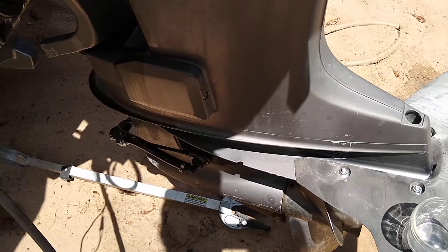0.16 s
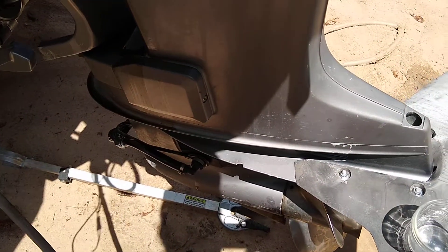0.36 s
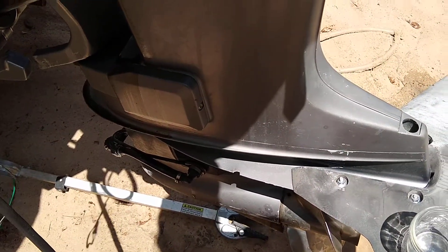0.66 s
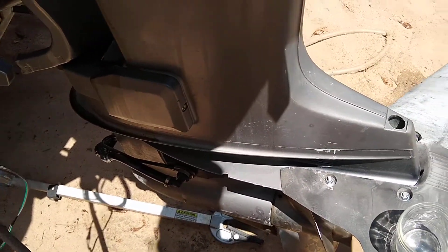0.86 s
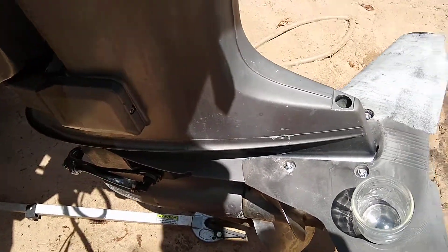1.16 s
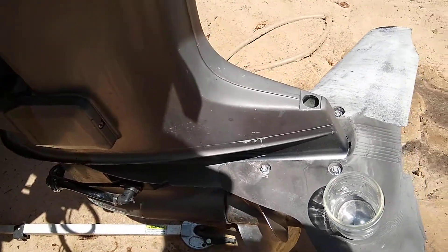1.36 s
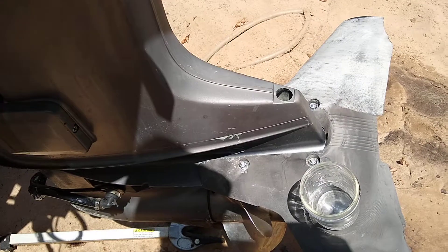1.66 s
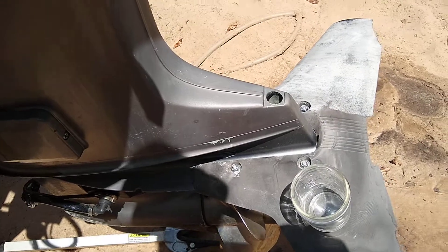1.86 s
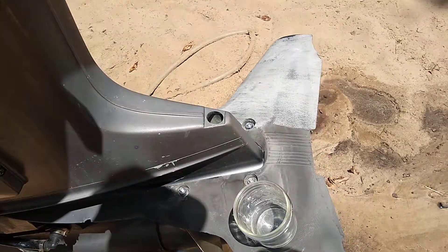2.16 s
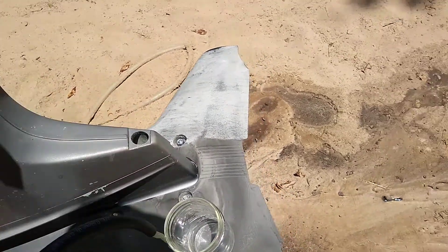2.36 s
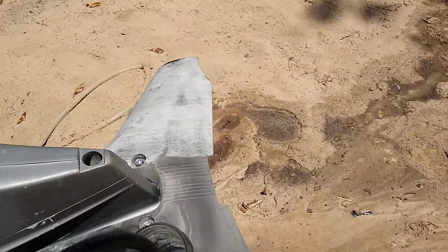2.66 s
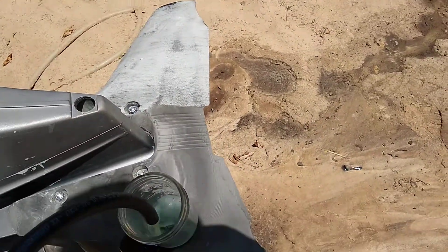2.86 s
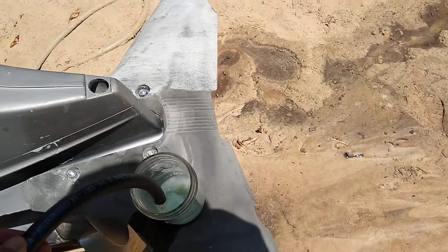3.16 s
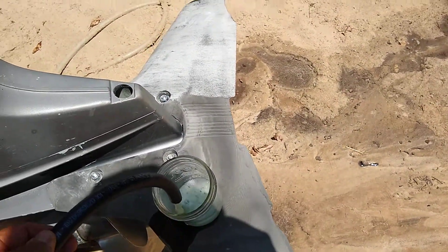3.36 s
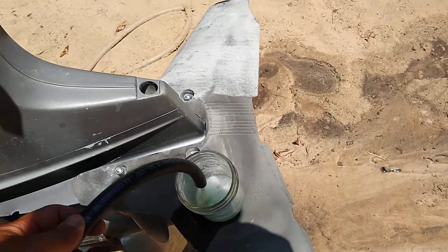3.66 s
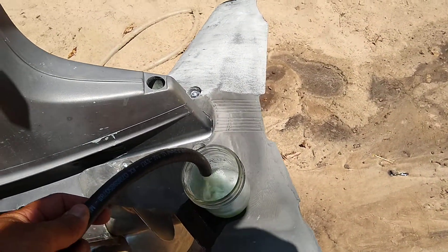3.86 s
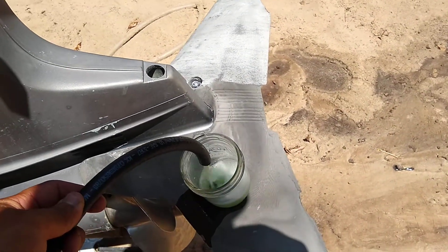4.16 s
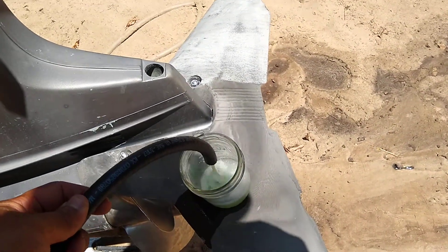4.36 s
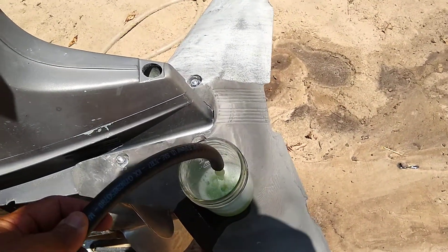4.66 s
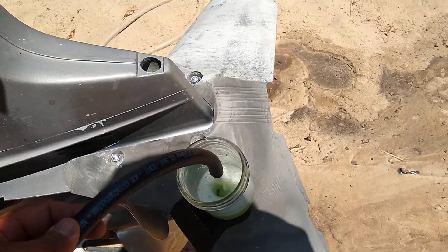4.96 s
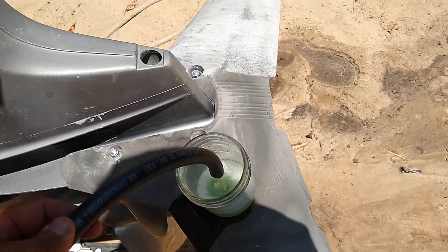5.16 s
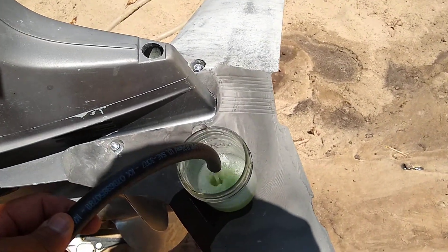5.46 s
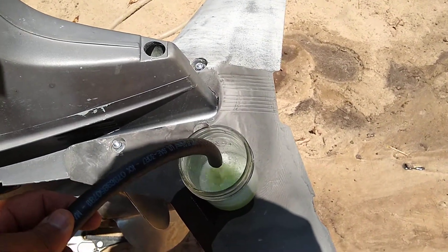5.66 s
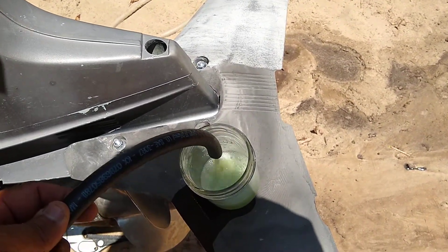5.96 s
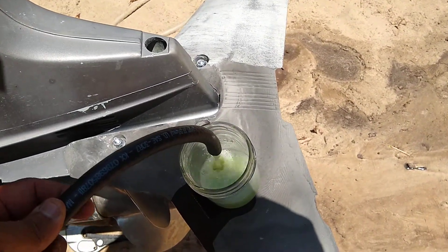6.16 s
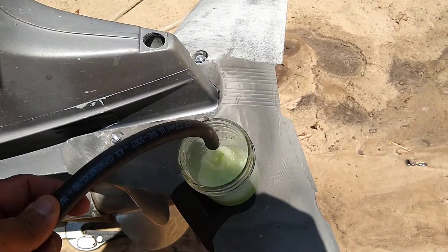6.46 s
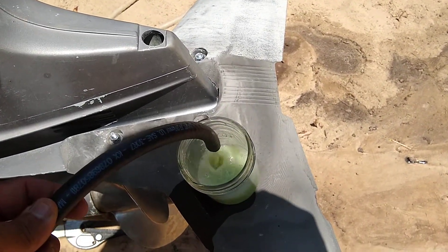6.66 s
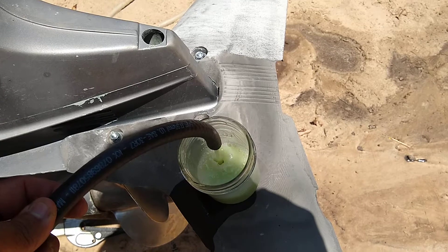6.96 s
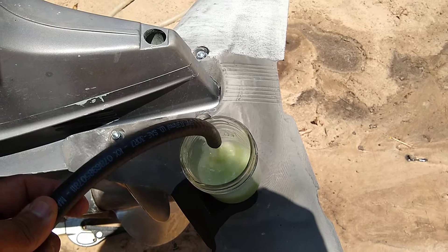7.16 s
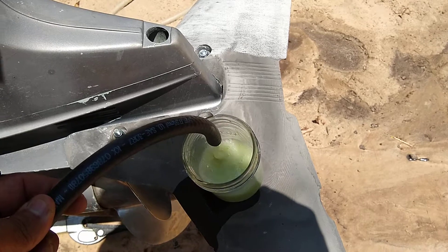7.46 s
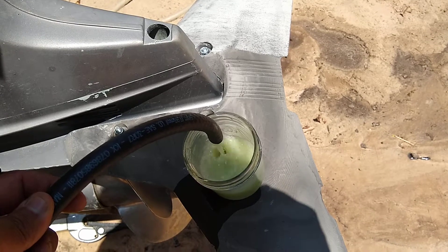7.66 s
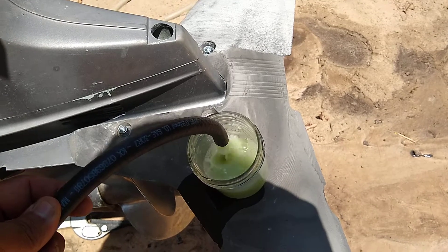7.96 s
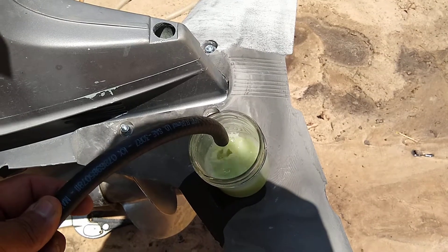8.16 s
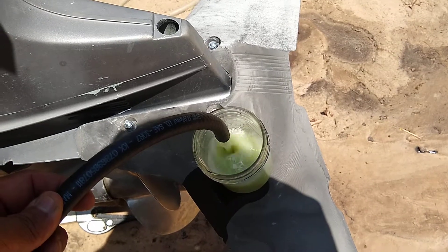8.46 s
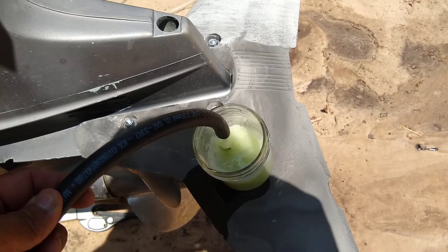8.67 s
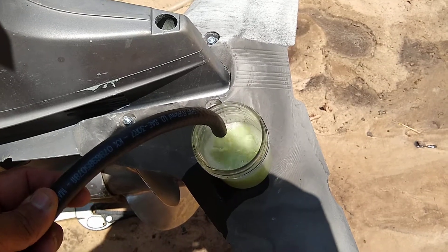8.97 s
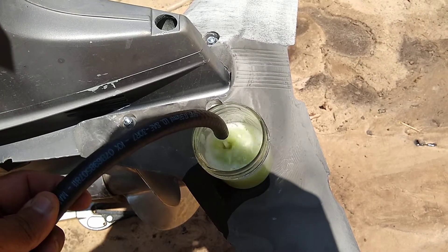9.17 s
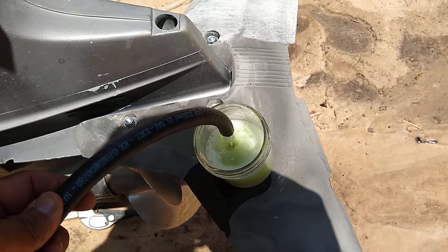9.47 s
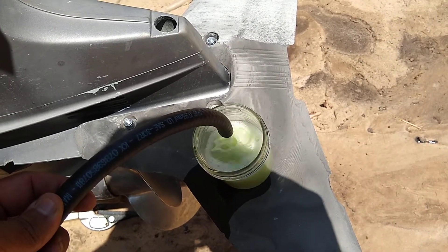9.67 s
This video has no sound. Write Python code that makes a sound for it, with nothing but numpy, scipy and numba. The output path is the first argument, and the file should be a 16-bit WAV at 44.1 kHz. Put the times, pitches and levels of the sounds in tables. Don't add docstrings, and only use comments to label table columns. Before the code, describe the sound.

Close, dry phone pickup: a rapid, raspy pump runs throughout, sizzling at first and duller as the phone turns away. Early ticks, drags and dull bumps come from a hose on a vehicle's plastic panel. After about four seconds, pulsed liquid bubbles and splashes inside a glass jar, with wet slaps and bright drips, rising in pitch. Low open-air rumble, small wind puffs and a very faint distant machine hum come late.

```python
import sys
import numpy as np
from scipy import signal
from scipy.fft import rfft, irfft, next_fast_len
from scipy.io import wavfile
from scipy.ndimage import uniform_filter1d
from numba import njit

SR = 44100
rng = np.random.default_rng(int(sys.argv[2]) if len(sys.argv) > 2 else 0)


def voltage_ratio(level):
    return 10 ** (np.asarray(level, float) / 20)


def waveform_to_disk(signal):
    frames = np.transpose(np.atleast_2d(signal))
    scaled = np.clip(frames, -1, 1) * 32767
    samples = np.round(scaled).astype(np.int16)
    wavfile.write(sys.argv[1], SR, samples)


N = 432534
T = np.arange(N) / SR
PATHS = 3
STROKE_HZ = 17.377
TURNED_S, AT_JAR_S = 3, 4.95

# (time [s], lead over an even beat [strokes])
STROKE_SLIP = [(0.3, 0.186), (1.1, 0.168), (1.9, 0.159), (2.7, 0.114), (3.5, 0.147), (4.3, 0.138),
               (5.1, 0.131), (5.9, 0.101), (6.7, 0.138), (7.5, 0.152), (8.3, 0.177), (9.1, 0.155)]


def stroke_count():
    return STROKE_HZ * T + curves(STROKE_SLIP)[0] + .265


# (time [s], rasp [dB], knock [dB], leak between pushes [dB])
PUMP_LEVELS = [(0.0, -49, -70, -72), (0.5, -47.5, -54, -69), (1.2, -49.5, -69, -54), (1.9, -48, -53.5, -37),
               (2.4, -51, -55.5, -54), (3.0, -47, -47.5, -77), (3.6, -46.5, -50, -95),
               (4.3, -50.5, -48, -3.5), (4.9, -46.5, -48, -26), (5.6, -56, -53.5, -3),
               (6.1, -49.5, -51, -22), (6.8, -50.5, -48.5, -10), (7.5, -51, -52, -25), (8.0, -56, -50.5, 1),
               (8.4, -50.5, -49, -10.5), (8.8, -54.5, -54, -28), (9.2, -53, -51.5, -6),
               (9.81, -54, -56, -38)]


def pump(strokes):
    rasp_db, knock_db, leak_db = curves(PUMP_LEVELS)
    beat, phase = np.divmod(strokes, 1)
    chance = rng.standard_normal((200, 3))[beat.astype(int)].T
    end = .45 + .025 * chance[0]
    push = np.minimum(phase / .03, 1) * np.exp(-np.maximum(phase - end, 0) / .1)
    push = push * voltage_ratio(1.5 * chance[1])
    gate = push + voltage_ratio(leak_db) * voltage_ratio(-7 * phase)
    snap = np.exp(-np.abs(phase - end + 0.0408) / STROKE_HZ / 0.00064)
    snap = (phase > end - .06) * snap * voltage_ratio(1.0 + 0.94 * chance[2])
    flow = grit(400, 3.6, 12.6) * (gate + snap)
    spit = grit(200, 7, 0.13) * (push + voltage_ratio(leak_db - 6)) * voltage_ratio(1.8 * chance[0])
    sizzle_db = -6.5 + 0.5367 * T
    hiss = rasp(flow, chance[0]) + voltage_ratio(sizzle_db) * sizzle(voltage_ratio(-8) * flow + spit)
    hiss = colour(hiss, [(12900, 0), (14100, -24)]) + fizz(flow * (push + voltage_ratio(-25)), chance[2])
    return voltage_ratio(rasp_db + 6.5) * hiss + voltage_ratio(knock_db + 2.0) * knock(phase, chance[2])


# (frequency [Hz], gain [dB])
RASP_TONE = [(1200, -43), (2200, 5.5), (4300, 1.5), (6500, 6), (8800, -21), (13000, 2.5), (14500, -45)]


def rasp(flow, chance):
    ring_hz = np.interp(T, [0.4, TURNED_S], [7180, 5940])
    casing = ring(flow, ring_hz * (1 + 0.043 * chance), 1470.0)
    return unit(colour(flow, RASP_TONE) + voltage_ratio(5.5) * casing)


# (frequency [Hz], width [Hz], level [dB])
SIZZLE_MODES = [(9000, 1300, 3.5), (11450, 1300, 11.5), (9200, 4100, -31), (12600, 690, -33)]
# (time [s], frequency [Hz], level [dB])
GLINT = [(0, 12400, 9.5), (.9, 11980, 13.5), (1.5, 12400, 3), (2.1, 10500, -9), (2.6, 11700, 10),
         (3.5, 11860, 12.5), (4.0, 10700, 7), (5.0, 11700, 7), (7.0, 11400, -4), (9.81, 11600, 0)]


def sizzle(spit):
    glint_hz, glint_db = curves(GLINT)
    return unit(modes(spit, SIZZLE_MODES) + voltage_ratio(glint_db) * ring(spit, glint_hz, 980.0))


FIZZ_HZ = 13400, 14200, 15000, 15700


def fizz(flow, chance):
    turns_s = [TURNED_S - .1, TURNED_S + .2, AT_JAR_S - .2, AT_JAR_S + 0.16]
    fizz_db = np.interp(T, turns_s, [-9, -9, -9, -16])
    total = 0
    for hz in FIZZ_HZ:
        patch = colour(flow, [(hz - 700, -40), (hz - 350, 0), (hz + 350, 0), (hz + 700, -40)])
        total = total + voltage_ratio(4 * walk(count=35).clip(-2.5, 1)) * patch
    return voltage_ratio(fizz_db + 2.2 * chance) * unit(total)


# (frequency [Hz], width [Hz], level [dB])
KNOCK_MODES = [(122, 22, -14), (208.7, 4.5, 1), (293, 10.5, -1.5), (334.5, 13.3, 2), (377, 28.6, -1.5),
               (506.3, 22, -0.5), (630, 19, -4), (787.6, 18, 0), (1049, 50, 5)]


def knock(phase, chance):
    since = (phase - .47) % 1 / STROKE_HZ
    blow = np.sin(np.pi * np.minimum(since / .0012, 1)) ** 2
    rattle = noise() * np.minimum(since / 0.021, 1) * np.exp(-since / 0.003)
    strike = (unit(blow) + unit(rattle)) * voltage_ratio(2.2 * chance)
    return unit(modes(strike, KNOCK_MODES, drift=.035 * walk(count=3)))


# (time [s], pitch [Hz])
COLUMN = [(3.5, 885), (4.5, 863), (6.1, 948), (7.0, 1008), (8.5, 1201), (9.81, 1320)]
# (time [s], peak [dB], pitch [Hz])
PLOPS = [(0.146, -39, 1090), (0.883, -41.5, 1010), (3.736, -33, 870), (4.308, -25.5, 1003),
         (4.577, -29.5, 884), (5.042, -31.5, 900), (5.265, -31.5, 1240), (5.294, -29, 950),
         (5.39, -31, 860), (5.553, -23.5, 954), (5.605, -32, 864), (5.711, -28.5, 937), (5.946, -33, 857),
         (6.074, -29, 890), (6.172, -32, 956), (6.312, -33.5, 914), (6.42, -32, 960), (6.5, -28, 920),
         (6.713, -26.5, 1040), (6.816, -22.5, 926), (6.974, -34.5, 850), (7.573, -30, 1040),
         (7.798, -32.5, 1130), (7.914, -31.5, 1260), (8.075, -31, 1206), (8.254, -33.5, 1210),
         (8.488, -33, 1100), (8.781, -30, 1266), (9.641, -36.5, 1450), (7.486, -40, 1250)]
# (time [s], peak [dB])
GULPS = [(3.845, -35.5), (4.084, -37), (4.245, -37.5), (4.36, -35.5), (4.538, -40), (4.698, -34.5),
         (4.815, -35.5), (5.155, -37.5), (6.022, -37), (6.118, -33.5), (6.484, -39), (6.574, -34),
         (7.029, -45), (7.162, -32), (7.212, -40), (7.227, -36), (7.641, -36.5), (7.691, -37),
         (7.748, -35.5), (7.891, -38.5), (8.302, -32.5), (8.541, -31.5), (8.716, -35.5), (8.816, -43),
         (8.892, -30), (9.41, -40), (9.124, -50), (9.521, -42), (9.697, -39), (9.753, -44.5)]
# (time [s], peak [dB])
PLINKS = [(4.083, -30), (4.363, -25.5), (4.696, -23), (5.0905, -29), (5.264, -15.5), (6.0194, -26),
          (6.269, -19.5), (6.3115, -24), (7.094, -22.5), (7.24, -29), (7.6265, -21), (7.693, -20),
          (7.8046, -22), (7.8588, -27), (7.916, -16), (7.949, -23), (8.028, -26), (8.074, -30),
          (8.259, -24), (8.306, -25), (8.435, -19), (8.487, -22), (8.547, -20), (8.6064, -24.5),
          (8.662, -22), (8.724, -23.5), (8.8373, -26), (8.893, -18.5), (9.124, -26), (9.762, -34)]
# (time [s], peak [dB], pitch [Hz], 60 dB decay [s])
TICKS = [(0.112, -23, 7200, .003), (0.2, -39, 6000, .003), (0.676, -21, 7200, .003),
         (0.795, -29, 6000, .003), (0.849, -24, 6040, .003), (1.082, -24, 5960, 0.0034),
         (7.742, -31, 1150, .015), (0.225, -25, 3560, 0.0044), (0.574, -31, 3600, 0.0047),
         (0.611, -50, 3260, 0.006), (5.402, -23, 2800, 0.0089), (5.625, -29, 3100, 0.01),
         (6.087, -27, 975, 0.023), (7.739, -31, 3100, 0.014), (0.3234, -28, 3720, 0.014),
         (1.1224, -26.5, 3170, 0.0055), (2.4477, -16.5, 3200, 0.0022), (2.5778, -17, 3600, 0.0014),
         (4.3097, -28, 2470, 0.044), (4.429, -29, 3160, 0.0074), (5.3882, -23.5, 2710, 0.016),
         (5.607, -11, 4730, 0.011), (5.664, -31, 2650, 0.03), (5.7099, -36, 3170, 0.016),
         (6.4892, -23, 2640, 0.022), (8.088, -20, 3480, 0.0054), (0.356, -41, 1080, 0.027),
         (0.457, -33, 1140, 0.013), (0.775, -37, 1040, 0.035), (0.838, -34.5, 1060, 0.025),
         (6.174, -28, 685, 0.027), (6.314, -29, 650, 0.026), (6.502, -38, 763, 0.022),
         (8.941, -27.5, 1234, 0.027), (9.069, -31.5, 1330, 0.026), (9.235, -27.5, 1340, 0.015),
         (9.251, -32, 1340, 0.013), (9.236, -28, 3260, 0.0092), (8.721, -29, 1370, 0.035),
         (7.572, -29, 1240, 0.028), (7.799, -41, 1280, 0.0087), (5.156, -38, 2900, 0.014),
         (8.195, -32, 3120, 0.011), (8.319, -28, 3220, 0.012)]
# (time [s], peak [dB], pitch [Hz])
BLIPS = [(4.453, -37, 860), (4.649, -39, 850), (4.936, -45, 1190), (5.504, -43, 1140), (5.667, -39.5, 900),
         (5.762, -38, 1020), (5.903, -40, 910), (6.049, -39, 910), (6.237, -40, 797), (6.445, -31.5, 994),
         (6.53, -36, 1040), (6.622, -50, 1060), (6.879, -35, 980), (6.895, -34, 840), (7.092, -34.5, 1040),
         (7.311, -38, 1270), (7.344, -39.5, 1250), (7.428, -37, 1050), (7.92, -36, 1400),
         (8.004, -34, 1070), (8.194, -34, 1150), (8.351, -41, 1060), (8.415, -35, 1190), (8.433, -33, 1170),
         (8.595, -35, 1220), (8.825, -36.5, 1200), (8.869, -44, 1290), (8.986, -40, 1080), (9, -39, 1280),
         (9.122, -43, 1280), (9.157, -46, 795), (9.273, -37, 1060), (9.333, -42, 1040), (9.463, -40, 1380),
         (9.576, -43.5, 1320)]
# (time [s], peak [dB], pitch [Hz])
DRIPS = [(2.2972, -64, 3400), (2.6414, -33, 3520), (3.7199, -47, 3260), (4.0083, -39, 3330),
         (4.5375, -30, 2770), (4.872, -36, 2800), (5.0499, -42, 2940), (5.3193, -32, 2820),
         (5.4266, -34, 3500), (5.5513, -44, 2850), (6.073, -31.5, 3130), (6.1185, -31, 3050),
         (6.1439, -30, 3050), (6.3876, -25, 2840), (6.4078, -28, 2840), (6.423, -25, 3070),
         (6.566, -27, 2980), (6.655, -43, 3100), (6.7101, -36, 3060), (6.8149, -21, 2860),
         (6.8947, -46, 3250), (6.9416, -27, 2930), (7.0005, -29, 3190), (7.0299, -35, 2880),
         (7.0763, -43, 2950), (7.1916, -30, 2970), (7.3697, -31, 3160), (7.418, -28, 3040),
         (7.5736, -30, 3150), (7.7338, -34, 3130), (8.1439, -29, 3000), (8.7809, -43, 3380),
         (9.0972, -40, 3160), (9.411, -32, 3300), (9.5876, -31, 3200), (9.6974, -45, 3300)]
PLOP_T60_S, PLINK_T60_S = 0.026, 0.019


def jar(strokes):
    column_hz = curves(COLUMN)[0]
    upper_hz = 2500 + 0.5 * column_hz
    s, db, hz = np.transpose(PLOPS).copy()
    plops = bubbles(s, voltage_ratio(db + 9.5), hz, PLOP_T60_S + 0 * s, 0.0082, 0.023)
    s, db = np.transpose(GULPS).copy()
    gulps = bubbles(s, voltage_ratio(db + 9.5), np.interp(s, T, column_hz), PLOP_T60_S + 0 * s, 0.0094, 0.021)
    s, db = np.transpose(PLINKS).copy()
    plink_hz = 0.99 * np.interp(s, T, upper_hz)
    plinks = bubbles(s, voltage_ratio(db - 1.0), plink_hz, PLINK_T60_S + 0 * s, 0.186, 0.031)
    s, db, hz, t60 = np.transpose(TICKS).copy()
    ticks = bubbles(s, voltage_ratio(db + 6.0), hz, t60.clip(.002, .2), 0.022, 0.074)
    strays = pings(BLIPS, 5.2, 0.027, 0.0088) + pings(DRIPS, 2.5, 0.012, .05)
    cracks = slaps()
    after_hz = .97 * column_hz * (1 + 0.034 * walk(count=40))
    after = voltage_ratio(-2) * ring(plops + gulps + cracks, after_hz, 44.0)
    poured = pouring(strokes, column_hz, upper_hz)
    return poured + plops + gulps + plinks + ticks + cracks + strays + after


# (time [s], gurgle [dB])
JET_FORCE = [(2.9, -77), (3.9, -77.5), (5.4, -74.5), (5.85, -78.5), (6.4, -66), (6.75, -72), (7.0, -65.5),
             (7.35, -71.5), (9.0, -75.5), (9.81, -79.5)]


def pouring(strokes, column_hz, upper_hz):
    gurgle_db = curves(JET_FORCE)[0]
    fade_in = np.clip((T - 2.9) / 1.2, 0, 1)
    spurt = voltage_ratio(-9 * (strokes % 1))
    gurgle = swarm(column_hz, spurt, count=1700, t60=0.016, spread=0.36)
    splash = swarm(upper_hz, spurt, count=1400, t60=0.016, spread=0.19)
    splash = splash + voltage_ratio(-4.0) * swarm(2.0 * column_hz, spurt, count=2500, t60=0.053, spread=0.8)
    return fade_in * voltage_ratio(gurgle_db + 18.5) * (gurgle + voltage_ratio(4) * splash)


# (time [s], peak [dB])
SLAPS = [(4.082, -54), (4.308, -52), (5.09, -54.5), (5.2635, -47), (5.3888, -49), (5.606, -51.5),
         (5.665, -56), (5.71, -51.5), (6.49, -57), (6.71, -60), (6.8148, -51), (7.092, -53.5), (7.574, -56),
         (7.691, -56), (7.803, -66), (7.857, -53.5), (7.918, -49), (8.028, -58), (8.4307, -49),
         (8.4916, -51), (8.546, -53.5), (8.7215, -59), (8.894, -55), (9.697, -56.5), (9.7638, -57),
         (5.552, -65), (6.309, -57), (8.303, -61), (8.7825, -73)]


def slaps():
    s, db = np.transpose(SLAPS)
    crack_modes = [(1580, 760, 6), (3020, 1400, 10), (4870, 2000, 6), (11000, 6000, -2)]
    cracks = modes(struck(s, db + 25, 0.0025), crack_modes)
    s, db = np.transpose([row[:2] for row in PLOPS + GULPS + BLIPS])
    return cracks + modes(struck(s, db + 12, 0.0029), [(1500, 1400, -4), (2780, 1230, -1)])


# (time [s], held [s], scrape [dB], panel ring over scrape [dB])
DRAGS = [(.78, 0.036, -54, -8.5), (.84, 0.0072, -62, -7), (.92, 0.024, -49.5, -10), (1.03, 0.01, -64, -3),
         (1.125, 0.038, -58, -5), (1.28, 0.091, -58, -3.5), (1.42, 0.049, -53.5, -5),
         (1.5, 0.028, -50.5, -38), (1.62, 0.22, -56, -10.5), (1.935, 0.012, -49.5, -7.5),
         (2.05, 0.025, -41, -16.5), (2.12, 0.17, -60.5, -9)]
# (time [s], peak [dB])
THUDS = [(0.026, -34.5), (0.082, -37), (0.396, -35), (0.425, -35.5), (0.452, -37), (1.039, -33),
         (1.159, -45), (1.228, -40), (1.441, -34), (0.144, -39), (0.353, -37), (0.646, -35), (0.772, -35),
         (0.833, -31), (0.602, -37), (0.924, -42), (0.95, -40), (3.92, -33), (4.02, -35), (1.326, -30.5),
         (1.387, -29.5), (1.496, -45), (1.585, -29), (1.729, -50), (1.812, -27.5), (1.861, -28.5),
         (1.898, -48), (1.975, -41), (2.098, -32), (2.132, -37), (2.21, -50), (2.311, -45)]
# (time [s], peak [dB], pitch [Hz])
TAPS = [(1.1195, -33.5, 1656), (1.269, -35.5, 1650), (1.3094, -54, 1620), (1.3504, -37, 1350),
        (1.4326, -35, 1900), (1.461, -33, 1630), (1.5753, -43, 1620), (1.6446, -41, 1650),
        (1.6995, -42, 1640), (1.7528, -51, 1620), (1.7896, -40, 1610), (1.8441, -53, 1660),
        (1.8656, -59, 1620), (1.894, -60, 1430), (1.9294, -49, 1600), (1.9756, -31, 1640),
        (2.038, -35, 1620), (2.1001, -32, 1630), (2.208, -44, 1645), (2.3051, -50, 1330)]
# (frequency [Hz], width [Hz], level [dB])
BODY = [(216, 40, -8.5), (380, 46, 3), (1040, 83, -9), (610, 210, -23.5)]


def hose():
    slips = grit(2200, 1.2, -1.8)
    scrape = unit(modes(slips, [(3190, 550, -0.5), (4570, 550, 4.5), (5020, 680, 1.5)]))
    panel = unit(modes(grit(150, 3.4, -15), [(1627, 71, 7.7), (1900, 740, 7.8)]))
    drags = [voltage_ratio(db + 9.5) * held(s, held_s, 514, 231) for s, held_s, db, _ in DRAGS]
    rings = sum(voltage_ratio(row[3] + 6.0) * drag for row, drag in zip(DRAGS, drags))
    boom = unit(modes(grit(400, 2.5, -3), BODY))
    rumble = voltage_ratio(-7.0) * uniform_filter1d(rings, size=4000) * boom
    s, db = np.transpose(THUDS)
    thuds = modes(struck(s, db + 18, 0.0063), BODY)
    taps = pings(TAPS, 4.3, 0.048, 0.061)
    return sum(drags) * scrape + rings * panel + rumble + taps + thuds


# (frequency [Hz], gain [dB])
YARD_TONE = [(25, -26), (45, -32), (65, -4.5), (150, -2.5), (400, -10), (1000, -13.5), (9000, -21),
             (13000, -20), (14000, -35)]
# (time [s], level [dB])
YARD_LEVEL = [(0.0, -52.5), (0.7, -50), (1.1, -52.5), (1.6, -49.5), (2.5, -48), (3.1, -44), (4.0, -45),
              (6.0, -48), (6.6, -44.5), (7.5, -49), (8.5, -48), (9.81, -50.5)]


def yard():
    return unit(colour(noise(), YARD_TONE)) * voltage_ratio(curves(YARD_LEVEL)[0] + 0.9 * walk(14))


# (time [s], held [s], level [dB])
HUM = [
    (7.74, 0.9, -68),
    (9.35, .6, -74),
]
# (time [s], level [dB])
GUSTS = [
    (7.47, -71),
    (8.31, -51),
    (9.1, -51),
    (9.25, -52),
    (9.7, -49),
]


def handset():
    hum_gain = sum(voltage_ratio(db + 3.5) * held(s, held_s, 180, 180) for s, held_s, db in HUM)
    hum = hum_gain * np.sin(2 * np.pi * 60.0 * T)
    wind_tone = [(30, -4), (70, -7.0), (200, -18), (600, 7.5), (2000, -2.0), (9000, -10), (13500, -44)]
    wind = unit(colour(rng.standard_normal((2, N)), wind_tone))
    puffs = sum(voltage_ratio(db) * np.exp(-((T - s - .04) / 0.11) ** 2) for s, db in GUSTS)
    bumps = puffs * unit(ring(noise()[:1], np.full(N, 85.), 50.))
    return hum + voltage_ratio(curves(YARD_LEVEL)[0] - 10.0) * wind + bumps * np.array([[1], [-.6]])


# (frequency [Hz], lead of the right [rad])
PORT_LEAD = [(0, 3.1), (120, 1.9), (260, .6), (600, .1), (1350, 0), (1950, 2.8), (2230, 3.14),
             (23000, 62.0)]
# (frequency [Hz], left minus right [dB])
PORT_TILT = [(60, 3), (110, 13.5), (200, 10.5), (380, 7), (700, 0.5), (4400, -1), (8120, 8), (13000, -1)]


def ports(paths):
    half = np.array([[[-.5]], [[.5]]])
    lead_hz, lead = np.transpose(PORT_LEAD)
    tilt_hz, tilt_db = np.transpose(PORT_TILT)

    def response(f):
        level = voltage_ratio(-half * np.interp(f, tilt_hz, tilt_db))
        return level * np.exp(1j * half * np.interp(f, lead_hz, lead))

    pair = np.array([paths[0], voltage_ratio(-7.5) * paths[0] + voltage_ratio(-1.5) * paths[1]])
    left, right = shaped(pair, response)
    quadrature = shaped(right, lambda f: 1j * np.minimum(f / 1800, 1) ** 2)
    right = right + .12 * walk(count=16) * quadrature
    mid, side = (left[0] + right[0]) / 2, (left[1] - right[1]) / 2
    scatter_tone = [(300, -30), (2500, -34), (4400, -17), (6700, -21), (7800, -10), (8900, -12),
                    (10500, -5), (16000, -5)]
    return np.array([mid + side, mid - side]) + colour(paths[1:], scatter_tone)


def unit(x):
    return x / np.sqrt(np.mean(x ** 2))


def curves(table):
    s, *columns = np.transpose(table)
    return [np.interp(T, s, c) for c in columns]


def shaped(x, gain):
    size = next_fast_len(N + 4096)
    return irfft(rfft(x, size) * gain(np.arange(size // 2 + 1) * SR / size), size)[..., :N]


def colour(x, points):
    hz, db = np.transpose(points)
    return shaped(x, lambda f: voltage_ratio(np.interp(np.log(f + 1), np.log(hz), db)))


@njit
def ring(x, hz, width):
    y = np.empty(x.shape)
    g, k = np.tan(np.pi * hz / SR), width / hz
    for r in range(len(x)):
        band, low = 0., 0.
        for i in range(N):
            v = (band + g[i] * (x[r, i] - low)) / (1 + g[i] * (g[i] + k[i]))
            band = 2 * v - band
            low = low + 2 * g[i] * v
            y[r, i] = k[i] * v
    return y


def modes(x, table, drift=0.):
    total = 0
    for k, (hz, width, db) in enumerate(table):
        centre = np.full(N, 1. * hz) * (1 + drift)
        total = total + (-1) ** k * voltage_ratio(db) * ring(x, centre, 1. * width)
    return total


@njit
def bubbles(s, size, hz, t60, glide, swell):
    y = np.zeros(N + SR)
    for e in range(len(s)):
        start, phase, n = int(s[e] * SR), 0., int(t60[e] * SR)
        for i in range(n):
            u = i / n
            phase += 2 * np.pi * hz[e] * (1 + glide * u) / SR
            y[start + i] += size[e] * (1 - np.exp(-u / swell)) * np.exp(-np.log(1000) * u) * np.sin(phase)
    return y[:N]


def swarm(hz, spurt, count, t60, spread):
    chance = rng.random((count, 4)).T
    at = (chance[0] * (N - 1)).astype(int)
    size = spurt[at] * voltage_ratio(-3.2 * np.log(chance[1] + 0.0049))
    pitch = hz[at] * (1 + spread * (chance[2] - .5))
    return unit(bubbles(at / SR, size, pitch, t60 * (0.3 + chance[3]), 0.011, 0.03))


def pings(table, gain_db, t60, swell):
    s, db, hz = np.transpose(table).copy()
    return bubbles(s, voltage_ratio(db + gain_db), hz, t60 * (0.42 + 2.3 * rng.random(len(s))), 0.013, swell)


def noise():
    return rng.standard_normal((PATHS, N))


def grit(rate, spread_db, smooth_db):
    hits = (rng.random(N) < rate / SR) * voltage_ratio(spread_db * np.minimum(rng.exponential(size=N), 3.5))
    bursts = signal.lfilter([1], [1, -np.exp(-1 / (0.001 * SR))], hits)
    return unit(noise() * (unit(bursts) + voltage_ratio(smooth_db)))


def struck(s, db, decay_s):
    hits = np.zeros(N)
    hits[(s * SR).astype(int)] = voltage_ratio(db)
    return signal.lfilter([1], [1, -np.exp(-1 / (decay_s * SR))], hits) * noise()


def held(s, held_s, rise_db_per_s, fall_db_per_s):
    early, late = np.maximum(s - T, 0), np.maximum(T - s - held_s, 0)
    return voltage_ratio(-rise_db_per_s * early - fall_db_per_s * late)


def walk(count):
    k = int(SR / count)
    steps = np.repeat(rng.standard_normal(N // k + 1), k)
    return 1.8 * uniform_filter1d(uniform_filter1d(steps, k), k)[:N]


# (time [s], share cancelled [0-1])
PANEL_DIP = [(0, .45), (2.2, .5), (2.45, .97), (3.4, .92), (4.2, .6), (5.0, 0)]


def scene():
    strokes = stroke_count()
    pour = jar(strokes)
    jar_echo = voltage_ratio(-3.5) * modes(pour[2:], [(2060, 400, -9.5), (4800, 900, 1.5)])
    heard = ports(pump(strokes) + pour + hose() + yard()) + handset() + jar_echo
    return heard - curves(PANEL_DIP)[0] * modes(heard, [(12700, 2200, 0)])


def top_cut(x):
    return signal.sosfilt(signal.butter(12, 16480, fs=SR, output="sos"), x)


def record(dry):
    tone = [(20, -28), (45, 3.0), (90, -7.5), (12600, -1.5), (14000, -6.0), (15700, -8.0), (16150, -66)]
    mix = colour(dry, tone)
    return top_cut(mix)


dry = scene()
out = record(dry)
waveform_to_disk(out)
```